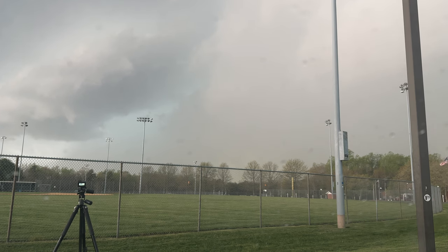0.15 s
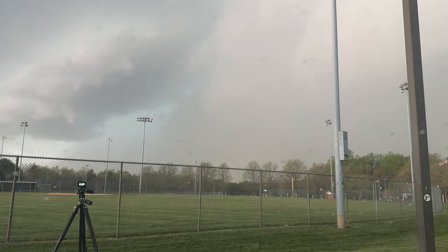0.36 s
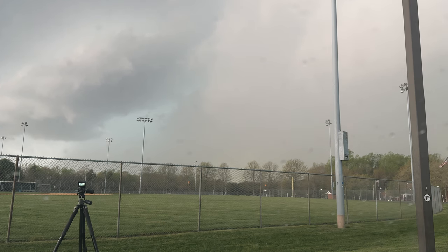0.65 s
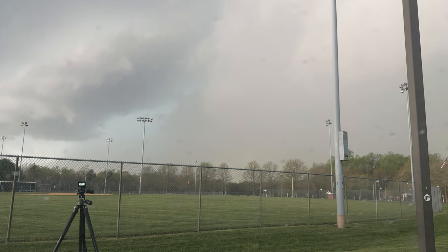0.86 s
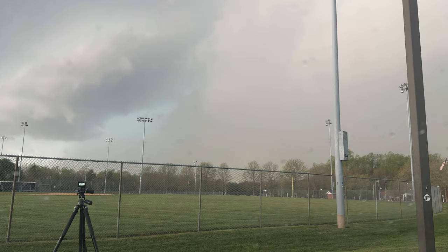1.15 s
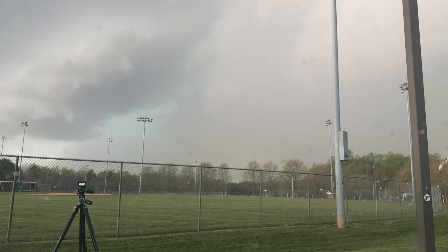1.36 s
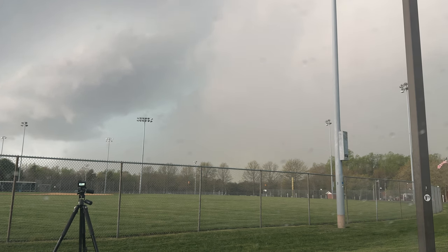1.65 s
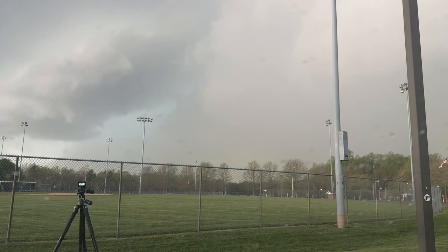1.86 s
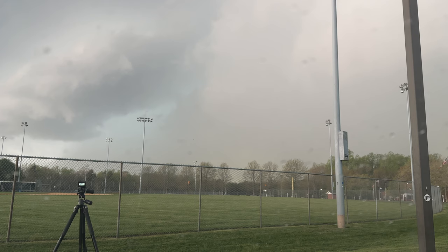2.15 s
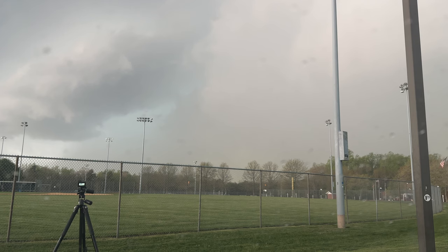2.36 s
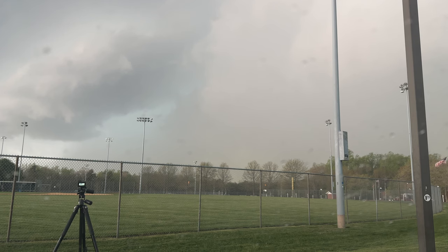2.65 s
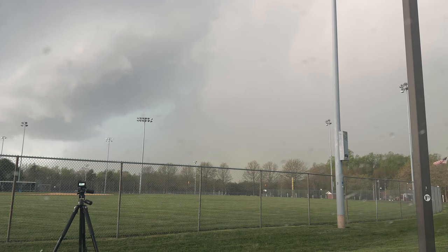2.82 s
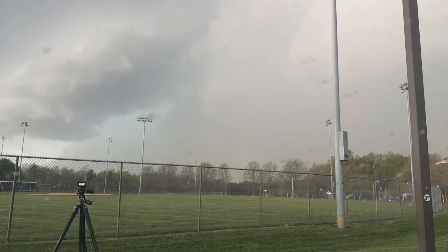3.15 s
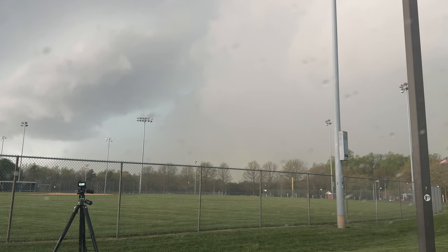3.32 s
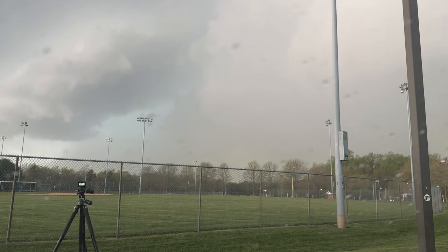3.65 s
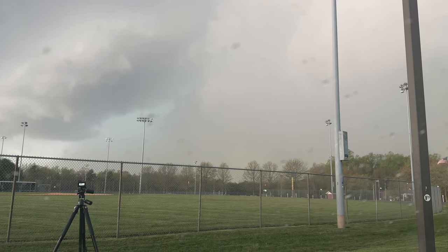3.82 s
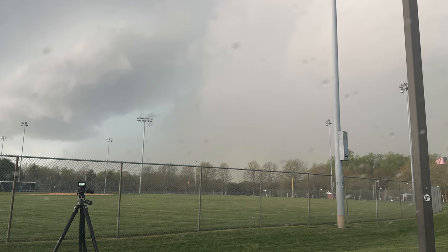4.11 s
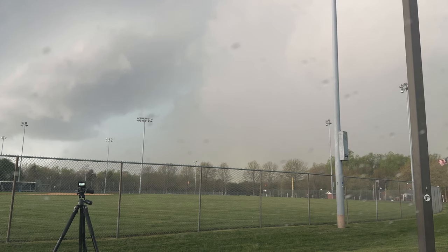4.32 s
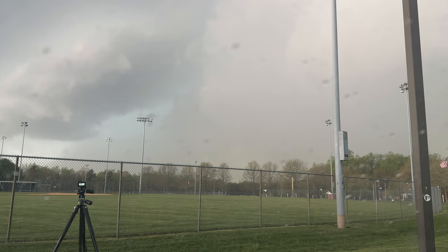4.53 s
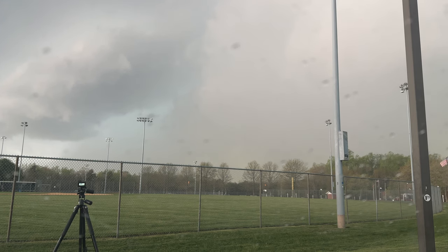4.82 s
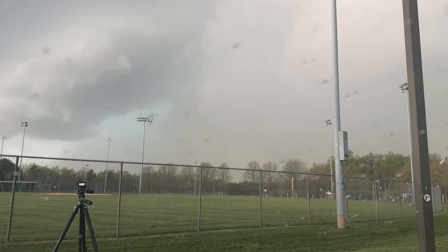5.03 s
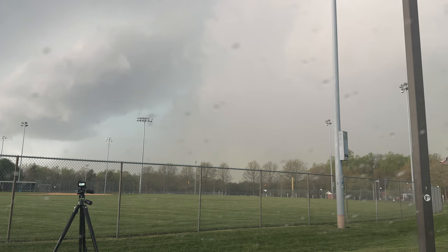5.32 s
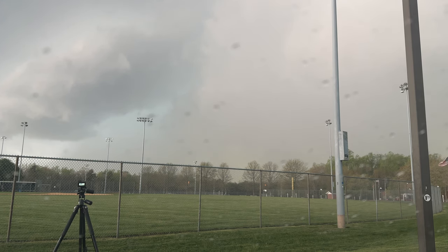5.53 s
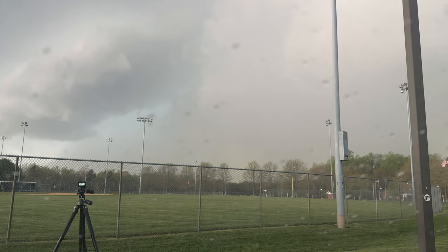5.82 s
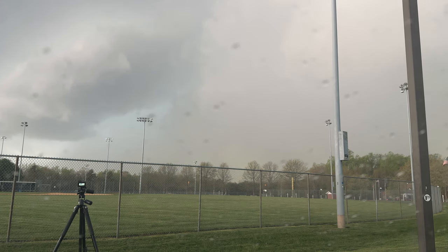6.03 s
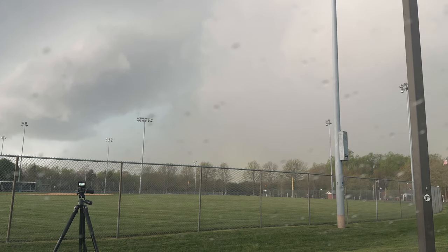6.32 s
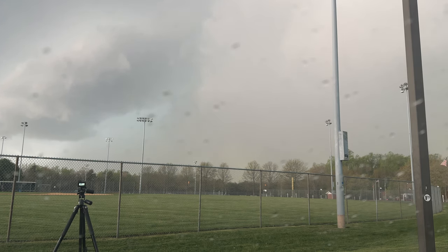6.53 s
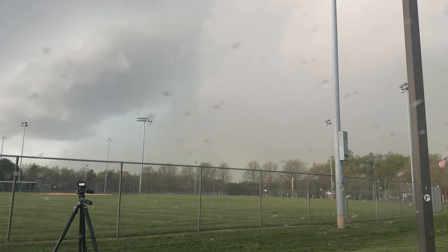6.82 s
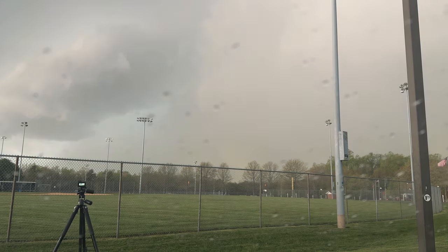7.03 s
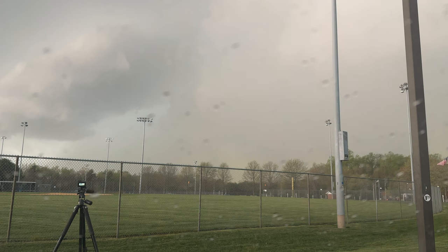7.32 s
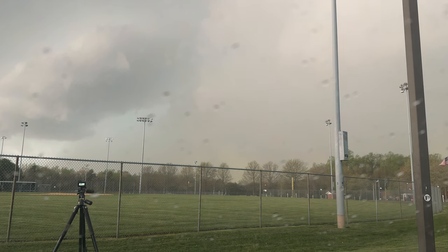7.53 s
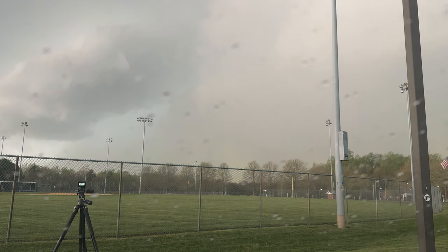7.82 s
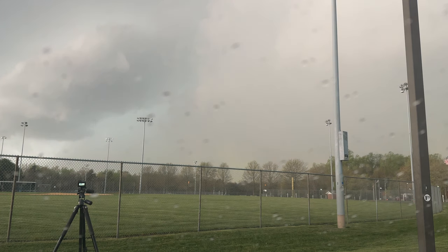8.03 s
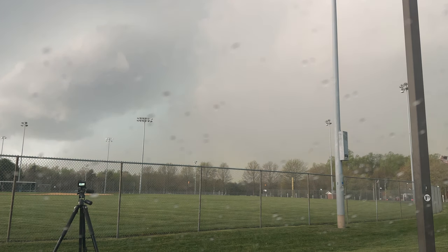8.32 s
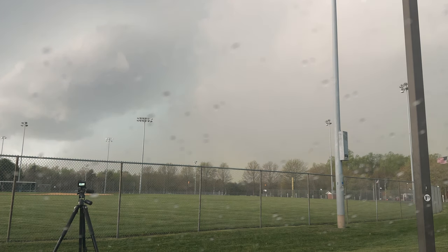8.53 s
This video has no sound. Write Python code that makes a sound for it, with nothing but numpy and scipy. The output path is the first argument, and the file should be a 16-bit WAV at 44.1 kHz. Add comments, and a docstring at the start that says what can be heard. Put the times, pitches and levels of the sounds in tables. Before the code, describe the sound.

Close stereo sound within a small, dry car cabin during a hailstorm. Scattered sharp clicks and duller taps come at uneven gaps, with a faint metallic jingle just after two seconds. Four much louder stones strike windshield, bonnet and roof, snapping hard and then thumping briefly. Between them, quiet low wind, a weak distant thunder roll, and a thin hiss of light rain remain.

```python
"""Four large hailstones crack on the glass, bonnet and roof of a parked car, heard from inside among small ticks.
Each crack is a dispersed click with a diffuse tail, and its thud is a sum of the sheet's low modes.
Behind them wind and far thunder rumble, light rain patters and hisses, and small metal parts jingle:
shaped noise, sparse faint blows and dying sines.
The two channels are alike in the bass and unlike above; near the top they are tied at a set phase."""
import sys
import numpy as np
from scipy import signal
from scipy.fft import rfft, irfft, next_fast_len
from scipy.io import wavfile
from scipy.ndimage import uniform_filter1d

SR = 44100
rng = np.random.default_rng(int(sys.argv[2]) if len(sys.argv) > 2 else 0)


def elevation(decibels):
    """Turn decibel levels (scalar or array-like) into linear amplitude ratios."""
    levels = np.asarray(decibels, float)
    return 10 ** (levels / 20)


def generate_wav(sig):
    """Save sig (samples, or channels by samples) to the path in sys.argv[1] as 16-bit PCM at SR."""
    pcm = np.round(np.clip(np.atleast_2d(sig).T, -1, 1) * 32767).astype(np.int16)
    wavfile.write(sys.argv[1], SR, pcm)


N = 381906  # length in samples

# wind rumble: t/s, level/dB
WIND = [(0, -41.5), (1.2, -43.5), (2.6, -43.5), (3.2, -42.5), (5.5, -44.5), (7.5, -44), (8.66, -43)]
# one roll of far thunder: peak time, peak level, 1/e times of its power
ROLL_S, ROLL_DB, ROLL_RISE_S, ROLL_FALL_S = 6.266, -37, 0.096, 0.45
# spectrum of wind and thunder: f/Hz, relative density/dB per Hz
RUMBLE_SPECTRUM = [(25, -28.5), (40, -25), (62, 3.5), (90, -0.5), (125, 5), (170, -6), (230, -10),
                   (300, -17), (420, -28.5)]
# course of the rain on the body: t/s, relative level/dB
SHOWER = [(0.0, -67), (0.31, -64), (0.48, -65.5), (0.95, -72), (1.15, -67), (2.0, -67), (2.6, -68),
          (2.7, -67.5), (4.22, -69.5), (4.85, -63), (5.04, -65.5), (5.74, -61), (5.96, -63), (7.57, -66.5),
          (7.69, -64), (8.54, -63.5), (8.66, -61)]
# spectrum of the steady rain: f/Hz, relative density/dB per Hz
RAIN_SPECTRUM = [(200, -13), (500, -5.5), (800, -9.5), (1300, -10), (2000, -13), (3000, -19), (4300, -23),
                 (5600, -27.5), (6500, -27.5), (6950, -24), (7700, -29), (9000, -31), (11500, -45),
                 (16000, -35.5)]
# spectrum of the fine hiss: f/Hz, relative density/dB per Hz
HISS_SPECTRUM = [(1500, -17.5), (3000, -7.5), (5600, 4), (7000, 6.5), (8500, -16.5), (10000, 4),
                 (11500, -8.5), (13500, -9), (15500, -19)]
HISS_DB, HISS_FOLLOWS = -100, 0.94  # level in its top band at mean rain; dB gained per dB of rain
# shakes of small metal parts: t/s, relative level/dB
JINGLES = [(2.109, -77.5), (2.265, -77.5), (2.452, -80)]
# modes of the metal parts: f/Hz, relative level/dB, T60/s
METAL = [(4250, 6, 0.13), (7100, 3, 0.11), (8500, 3, 0.26), (10230, 15.5, 0.096), (15500, -2, .15)]
# reverberation of the cabin: f/Hz, T60/s before each blow's own factor
CABIN = [(300, 0.24), (700, 0.11), (1840, 0.1), (4850, 0.099), (12800, 0.07)]
# small stones and taps: t/s, crack level/dB, top-band level/dB, pitch of the struck spot f/Hz, ring level/dB
TICKS = [(0.3278, -39.5, -50, 2190, -43.5), (0.366, -53.5, -62, 650, -53), (0.3802, -55, -70, 1390, -46),
         (0.529, -64.5, -83, 2920, -68), (0.651, -96, -84, 1095, -58), (0.778, -84, -87, 2830, -72),
         (0.886, -58.5, -53.5, 606, -56.5), (1.04, -68, -77, 980, -54.5), (0.982, -69, -77, 1180, -63),
         (1.083, -61.5, -65, 580, -58), (1.137, -69, -73, 1150, -55), (1.175, -73, -80, 1310, -78),
         (1.363, -55.5, -56, 3340, -59), (1.779, -59, -61, 3450, -59), (1.924, -72, -88, 2000, -68),
         (2.281, -59, -77, 3330, -61), (2.578, -79, -89, 3800, -66), (2.619, -56, -70, 1940, -54.5),
         (2.68, -71, -61, 5500, -57), (2.689, -53, -45, 894, -47), (2.7122, -48, -36, 850, -51),
         (2.9161, -87, -75, 4740, -62.5), (3.062, -42.5, -49, 2480, -45), (3.1407, -53.5, -62, 2420, -56.5),
         (3.238, -64.5, -72, 2840, -83), (3.271, -53, -69, 3300, -54), (3.366, -73, -81, 2670, -73),
         (3.424, -52, -52, 3050, -74), (3.4396, -60, -45.5, 590, -79), (3.467, -59.5, -82, 600, -75),
         (3.952, -61.5, -81, 662, -61.5), (4.7832, -38, -36, 920, -50.5), (4.933, -52.5, -58, 1440, -48),
         (4.9366, -38.5, -43, 947, -45.5), (4.9594, -42, -41, 564, -58), (5.217, -53, -76, 716, -73),
         (5.346, -63, -85, 630, -59), (5.4597, -57, -78, 630, -54), (5.5679, -75, -80, 940, -54.5),
         (5.596, -55.5, -58, 1030, -58.5), (5.611, -68, -80, 1100, -54), (5.6704, -65, -84, 3640, -54),
         (5.693, -76, -80, 955, -48), (5.71, -46.5, -41, 960, -52), (5.7239, -46, -44, 930, -67),
         (5.8022, -52.5, -55, 1020, -52.5), (5.855, -67, -80, 900, -60), (5.913, -58, -75, 1400, -60),
         (5.9376, -57, -63, 670, -61), (5.974, -62, -72, 1170, -79), (6.047, -58, -70, 1460, -62),
         (6.179, -59, -73, 1230, -59), (6.2, -62, -71.5, 1300, -55), (6.2342, -60, -87, 1330, -60),
         (6.287, -62, -80, 780, -52), (6.5105, -58.5, -76, 705, -67), (6.548, -55, -83, 885, -62),
         (7.212, -70, -83.5, 735, -54.5), (7.3487, -51, -63, 3790, -56.5), (7.6091, -60.5, -84, 647, -56.5),
         (7.8732, -81, -83, 620, -51), (8.205, -62.5, -85, 734, -54), (8.2742, -55.5, -60, 720, -56.5)]
# crack band of a light blow: lower f/Hz, upper f/Hz
TICK_BAND = (2260, 9200)
# top band of a light blow: lower f/Hz, upper f/Hz
TOP_BAND = (11000, 16500)
TICK_T60_S = 0.092  # tail at 6.5 kHz when crack and ring are level
SOFT_LONGER = 0.38  # dull blows last longer: dB of decay time per dB of ring over crack
SPOT_T60_S, SPOT_DB = 0.036, -2.5  # the spot's own tone: decay, level over the ring band
# large stones: t/s, blow level/dB, first click over its tail/dB, thud level/dB,
# tail T60 factor, thud T60 factor, nominal lag of the click at 1 kHz/s
STONES = [(2.9722, -13.5, 12.5, -21, 0.92, 1, 0.0024), (4.713, -16.5, 5.5, -21.5, 0.59, 1, 0.0028),
          (7.0925, -13, 7.5, -27, 0.65, 0.81, 0.0042), (8.3482, -12, 6.5, -17.5, 0.72, 1, .003)]
# low modes of the glass: f/Hz, relative level/dB, T60/s
GLASS = [(67, -4, 0.069), (127, 1, 0.09), (182, -0.5, 0.095), (286, 0.5, 0.033), (360, -4.5, 0.02),
         (484, -7, 0.019)]
# low modes of the bonnet: f/Hz, relative level/dB, T60/s before the thud factor
BONNET = [(68, -10, 0.82), (122, 8, 0.11), (175, -4.5, 0.18), (244, -2, 0.069), (327, 0.5, 0.059),
          (418, 0, 0.027), (647, -13, 0.041)]
# low modes of the roof: f/Hz, relative level/dB, T60/s before the thud factor
ROOF = [(68, -10.5, 0.41), (117.2, -4, 0.22), (171, -2.5, 0.12), (240, -6, 0.1), (334, -2.5, 0.13),
        (465, -33.5, 0.11), (620, -13, 0.052)]
# the sheet that each large stone hits: one mode table per stone
STRUCK = [GLASS, BONNET, ROOF, ROOF]
# colour of the crack where each large stone lands: f/Hz, relative gain/dB
SPOTS = [
    [(290, -27), (500, -3.5), (668, -8.5), (807, -9), (933, -14), (1210, -9.5), (1340, -14.5), (1640, -3),
     (2010, -13), (3020, -14.5), (3490, -19), (4530, -13), (7530, -14), (8830, -14.5), (10100, -19.5),
     (11300, -39), (13600, -22.5), (16000, -25)],
    [(290, -30.5), (500, -5.5), (688, -2.5), (974, -12.5), (1360, -2), (1870, -12.5), (2770, -5),
     (3540, -12), (3810, -14), (4090, -14), (5880, -15), (6330, -13), (7100, -17), (8960, -16.5),
     (10400, -21), (11000, -40), (13600, -19.5), (16000, -19.5)],
    [(290, -30.5), (500, -0.5), (586, -19.5), (807, -11.5), (988, -20.5), (1340, -10.5), (1550, -20.5),
     (1670, -13.5), (2010, -19), (2190, -10.5), (2690, -4), (3490, -17), (4340, -5), (5630, -21.5),
     (6700, -8.5), (7980, -21), (9360, -9.5), (10800, -29.5), (14500, -19), (16000, -25.5)],
    [(290, -24.5), (500, -3), (562, -7), (1060, -8), (1400, -19.5), (2100, -11), (2190, -12), (2980, -13),
     (4030, -25), (4730, -24), (5880, -22), (6330, -20), (7530, -27), (8330, -20.5), (10400, -31),
     (10800, -60), (12900, -32), (16000, -40.5)],
]
# relation of the two channels: f/Hz, likeness (0-1), phase lead of the right/rad, left over right/dB
CHANNELS = [(60, .99, 0, 1), (200, .94, 0, 1.5), (400, .85, 0, 1.5), (650, .3, .6, 0), (1000, .3, 2.3, 0),
            (1600, .35, 2.8, 0), (2400, .3, 5.4, 1), (4500, .3, 5.3, 1), (5800, .25, 4.9, 5),
            (7200, .45, 5.1, 7), (8500, .7, 6.9, 1), (9600, .8, 8, 0), (10300, .98, 9, 0),
            (11300, 1, 3 * np.pi, 0), (12300, .99, 9.8, 0), (13100, 1, 4 * np.pi, 0)]
# steep low-pass near 15.9 kHz: f/Hz, gain/dB
LOW_PASS = [(15750, -0.5), (15950, -20.5), (17000, -33.5)]


def read(points, hz, column=1):
    """Linear interpolation of a table on a log-frequency axis."""
    table = np.transpose(points)
    return np.interp(np.log(hz + 1), np.log(table[0] + 1), table[column])


def curve(table, column=1):
    """Linear interpolation in time: one control value at every sample."""
    return np.interp(np.arange(N) / SR, *np.transpose(table)[[0, column]])


def evened(x):
    """Mean-power normalisation: scales to rms 1."""
    return x / np.sqrt(np.mean(x ** 2) + 1e-20)


def peaked(x):
    """Short-time power normalisation: the loudest 3 ms get rms 1."""
    power = uniform_filter1d((x ** 2).mean(axis=0), size=132)
    return x / np.sqrt(power.max() + 1e-20)


def band(x, lo_hz, hi_hz):
    """Causal Butterworth band-pass."""
    sections = signal.butter(3, [lo_hz, hi_hz], "bandpass", fs=SR, output="sos")
    return signal.sosfilt(sections, x)


def coloured(x, points):
    """Minimum-phase filtering: the Hilbert transform of the log gain gives the phase of a causal filter."""
    size = x.shape[1]
    hz = abs(np.fft.fftfreq(size, 1 / SR))
    log_gain = np.log(elevation(np.maximum(read(points, hz), -60)))
    response = np.exp(np.conj(signal.hilbert(log_gain)))
    return irfft(rfft(x) * response[:size // 2 + 1], size)


def add(mix, s, sound):
    """Superposition: mixes a two-row sound in at time s."""
    part = mix[:, round(s * SR):][:, :sound.shape[1]]
    part += sound[:, :part.shape[1]]


def noise(points, level_db, lo_hz, hi_hz, patchy_db, flicker_db, size):
    """Gaussian short-time spectra with patches and shared flicker; level_db sets the level from lo_hz to hi_hz."""
    hop = size // 4
    frames, hz = N // hop + 5, np.fft.rfftfreq(size, 1 / SR)
    re, im = rng.standard_normal((2, 2, frames, len(hz))).swapaxes(2, 3)
    patches = uniform_filter1d(rng.standard_normal((frames, len(hz))), size=6, axis=0)
    patches = evened(uniform_filter1d(patches, size=8, axis=1)).T
    flicker = evened(uniform_filter1d(rng.standard_normal(frames), size=3))
    # beyond the table the spectrum falls by 40 dB per octave below and 30 above
    below = np.maximum(np.log2(points[0][0] / (hz + 1)), 0)
    above = np.maximum(np.log2((hz + 1) / points[-1][0]), 0)
    shape_db = read(points, hz) - 40 * below - 30 * above
    z = (re + 1j * im) * elevation(shape_db[:, None] + patchy_db * patches + flicker_db * flicker)
    x = signal.istft(z, nperseg=size, noverlap=size - hop)[1][:, :N]
    return x / np.std(band(x, lo_hz, hi_hz)) * elevation(level_db)


def storm_db():
    """Addition of powers: wind plus one roll of thunder that swells and dies away."""
    t = np.arange(N) / SR - ROLL_S
    roll = np.exp(-(t / np.where(t < 0, ROLL_RISE_S, ROLL_FALL_S)) ** 2)
    return 10 * np.log10(elevation(2 * curve(WIND)) + elevation(2 * ROLL_DB) * roll)


def rumble():
    """Low-frequency noise: wind and far thunder share one spectrum and add in power."""
    return noise(RUMBLE_SPECTRUM, storm_db(), lo_hz=39.7, hi_hz=298, patchy_db=1.76, flicker_db=1.53, size=2048)


def rain():
    """Noise as the limit of very many drops: a steady spectrum under the shower's envelope."""
    level_db = curve(SHOWER) + 2.5
    return noise(RAIN_SPECTRUM, level_db, lo_hz=466, hi_hz=1730, patchy_db=1.0, flicker_db=2.5, size=512)


def hiss():
    """High-frequency noise whose level varies nearly in proportion to the rain's, in dB."""
    rain_db = curve(SHOWER)
    level_db = HISS_DB + HISS_FOLLOWS * (rain_db - rain_db.mean())
    return noise(HISS_SPECTRUM, level_db, lo_hz=13380, hi_hz=14600, patchy_db=7.0, flicker_db=-3.5, size=256)


def blow(t60_factor, spread_s, direct_db, echo=0.75, size=8192):
    """Dispersion: bending waves travel faster at high pitch, so a click arrives as a falling chirp;
    the cabin answers with a dense tail that dies faster in the treble."""
    hz, t = np.fft.rfftfreq(size, 1 / SR), np.arange(size) / SR
    path = spread_s * rng.uniform(0.695, 1.4, (4, 2, 1))  # lag at 1 kHz on four paths to each view
    chirp = irfft(np.exp(-4j * np.pi * path * np.sqrt(1000 * hz)).sum(axis=0), size)
    chirp = chirp * np.exp(-t / (0.96 * spread_s))
    f, frame_s, z = signal.stft(rng.standard_normal((2, size)), SR, nperseg=128)
    decay = elevation(-60 * frame_s / (t60_factor * read(CABIN, f))[:, None])
    tail = signal.istft(z * decay, SR, nperseg=128)[1][:, :size]
    tail = tail * (1 - np.exp(-t / 0.00048))
    # the tail's bass also comes late
    tail = irfft(rfft(tail) * np.exp(-4j * np.pi * 0.6164 * spread_s * np.sqrt(1000 * hz)), size)
    sound = elevation(direct_db) * peaked(chirp) + peaked(tail)
    late = rng.integers(5, 22)  # samples
    sound[:, late:] += echo * sound[:, :-late]  # a nearby surface gives every spot its own peaks and dips
    return sound


def ringing(modes, rise_s, far_db, size=8192):
    """Modal superposition: dying sines, with other phases and a level far_db higher in the second view."""
    t, out = np.arange(size) / SR, 0
    for hz, db, t60 in modes:
        split_hz = hz * (1 + rng.normal(0, .015, (3, 1, 1)))  # uneven sheets split each mode in three
        waves = np.sin(2 * np.pi * (split_hz * t + rng.random((3, 2, 1))))
        out = out + elevation(db - 60 * t / t60) * waves.sum(axis=0)
    return peaked(out * (1 - np.exp(-t / rise_s))) * elevation(np.array([[0], [far_db]]))


def patter(per_s=80, spread_db=9.0, level_db=-4.0):
    """Random arrivals: stray drops and grains of ice, faint blows in twelve colours, follow the rain."""
    strength = elevation(spread_db * np.minimum(rng.exponential(1, N), 2))
    strength = strength * (rng.random(N) < per_s / SR)
    kind, mix = rng.integers(0, 12, N), np.zeros((2, N))
    for k, hz in enumerate(np.geomspace(700, 5000, num=12)):
        drop = band(blow(0.8, 0.00033, -23.0, size=4096), hz / 2.0, hz * 1.5)
        drop = peaked(drop) * (700 / hz) ** 0.2
        mix += signal.oaconvolve((strength * (kind == k))[None], drop, axes=1)[:, :N]
    return evened(mix) * elevation(level_db + curve(SHOWER))


def jingles():
    """Repeated excitation of fixed modes: each shake is a quick run of touches on the same metal parts."""
    mix = np.zeros((2, N))
    for s, db in JINGLES:
        for late_s, less_db in rng.random((6, 2)) * (.05, 8):
            ring = ringing(METAL, 0.00077, far_db=0, size=4096)
            add(mix, s + late_s, elevation(db - less_db + 16.0) * ring)
            touch = band(blow(0.55, 0.00053, -1, size=4096), 3000, 16000)
            add(mix, s + late_s, elevation(db - less_db + 13.0) * peaked(touch))
    return mix


def ticks():
    """Local resonance: small hail and taps are light blows that ring one spot of the sheet."""
    mix = np.zeros((2, N))
    for s, crack_db, top_db, hz, ring_db in TICKS:
        longer = elevation(SOFT_LONGER * np.clip(ring_db - crack_db, -12, 12))
        x = blow(TICK_T60_S * longer / read(CABIN, 6500), 0.001116, 0.49, size=3072)
        for db, edges in (crack_db, TICK_BAND), (top_db, TOP_BAND), (ring_db, (hz / 1.63, hz * 1.61)):
            add(mix, s, elevation(db) * peaked(band(x, *edges)))
        modes = [(hz, 0, SPOT_T60_S), (hz * 1.66, -5.0, SPOT_T60_S)]
        add(mix, s, elevation(ring_db + SPOT_DB) * ringing(modes, 0.0018, far_db=3.0, size=3072))
    return mix


def stones():
    """Impact on a plate: a dense chirped crack in the colour of the spot, and a thud of the sheet's low modes."""
    mix = np.zeros((2, N))
    for stone, modes, colour in zip(STONES, STRUCK, SPOTS):
        s, blow_db, direct_db, thud_db, tail, ring, lag_s = stone
        crack = coloured(blow(tail, lag_s, direct_db, echo=0.047), colour)
        add(mix, s, elevation(blow_db) * peaked(crack))
        thud = ringing(np.array(modes) * (1, 1, ring), 0.004, far_db=9, size=16384)
        add(mix, s + .003, elevation(thud_db) * thud)
    return mix


def scene():
    """Superposition of all sources in two views of the cabin's sound field."""
    return rumble() + rain() + hiss() + patter() + jingles() + ticks() + stones()


def band_limit(x):
    """A steep low-pass at the top of the band."""
    return signal.sosfilt(signal.butter(12, 17150, fs=SR, output="sos"), x)


def record(dry):
    """Partial coherence: the right channel has part of the left, turned in phase, and part of its own."""
    size = next_fast_len(N + 4096)
    hz = np.fft.rfftfreq(size, 1 / SR)
    left, other = rfft(dry, size) * elevation(read(LOW_PASS, hz))
    same = np.clip(read(CHANNELS, hz), 0, 1)
    turn = np.exp(1j * read(CHANNELS, hz, column=2))
    right = same * turn * left + np.sqrt(1 - same ** 2) * other
    balance = elevation(read(CHANNELS, hz, column=3) / 2)
    stereo = irfft(np.array([left * balance, right / balance]), size)[:, :N]
    return band_limit(stereo)


dry = scene()
out = record(dry)
generate_wav(out)
```